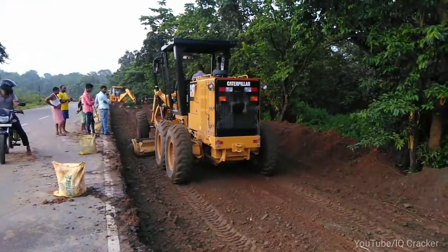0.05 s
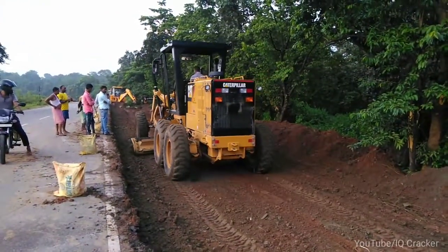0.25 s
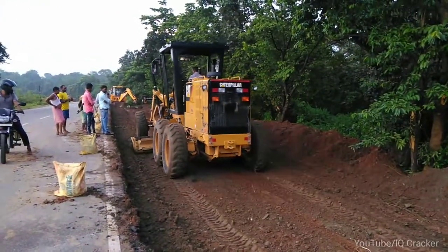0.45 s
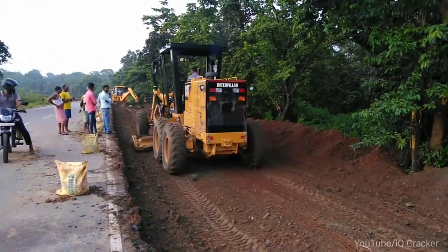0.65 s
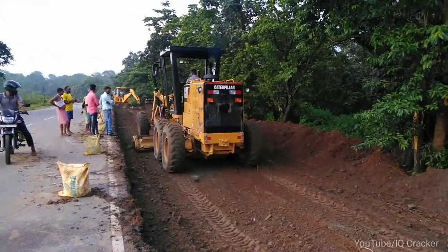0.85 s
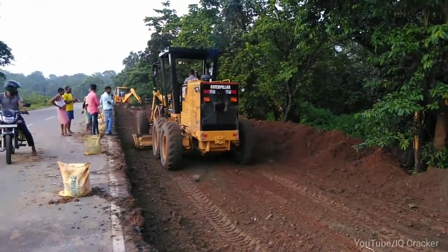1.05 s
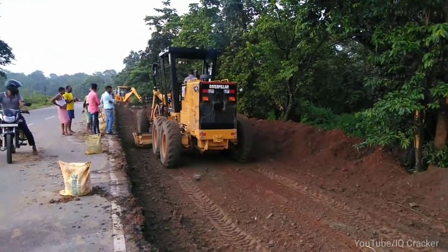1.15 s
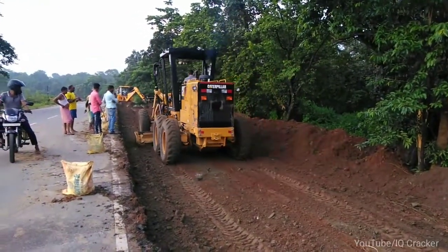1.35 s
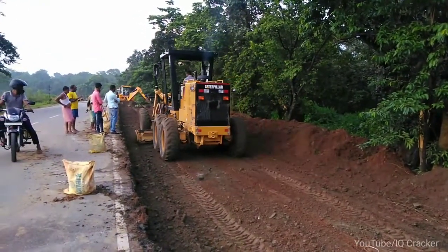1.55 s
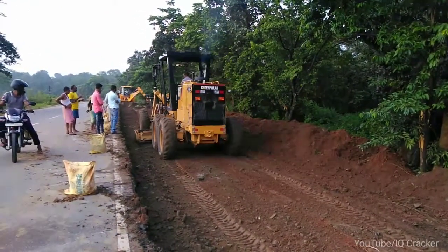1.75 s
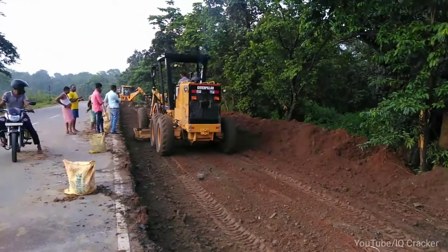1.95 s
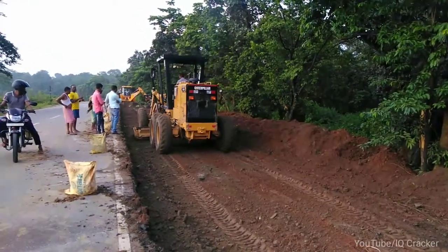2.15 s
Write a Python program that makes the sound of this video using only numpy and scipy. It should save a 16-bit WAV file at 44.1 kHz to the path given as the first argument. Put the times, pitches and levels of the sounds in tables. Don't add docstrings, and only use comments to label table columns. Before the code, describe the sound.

A large diesel road grader throbs under load, revs up hissing, then eases off outdoors

```python
import sys
import numpy as np
from scipy import signal
from scipy.fft import rfft, irfft
from scipy.io import wavfile

SR = 44100
rng = np.random.default_rng(int(sys.argv[2]) if len(sys.argv) > 2 else 0)


def level_to_linear(level):
    exponent = np.asarray(level, float) / 20
    return 10 ** exponent


def bounce(signal):
    frames = np.transpose(np.atleast_2d(signal))
    limited = np.clip(frames, -1, 1)
    pcm = np.round(limited * 32767).astype(np.int16)
    wavfile.write(sys.argv[1], SR, pcm)


N = 97020


def rms_one(x):
    return x / np.sqrt(np.mean(x ** 2) + 1e-20)


def in_time(rows):
    s, *columns = np.transpose(rows)
    return [np.interp(np.arange(N) / SR, s, c) for c in columns]


def at_hz(points, hz):
    point_hz, value = np.transpose(points)
    return np.interp(np.log(hz + 1), np.log(point_hz), value)


def drift(rate_hz):
    r = np.exp(-80 * np.pi * rate_hz / SR)
    white = rng.standard_normal(N // 40 + 2002)
    slow = signal.lfilter([1], [1, -2 * r, r * r], white)[2000:]
    return np.interp(np.arange(N) / 40, np.arange(len(slow)), rms_one(slow))


def noise(spectrum, gains, peaks=(), grain_db=0):
    hz = np.fft.rfftfreq(N, 1 / SR)
    low_hz, high_hz = spectrum[0][0], spectrum[-1][0]
    db = at_hz(spectrum, hz) + sum(d / (1 + (2 * (hz - f) / w) ** 2) for f, w, d in peaks)
    db -= 200 * ((hz < low_hz) | (hz > high_hz))
    grain = rng.standard_normal(N // 30 + 1).repeat(30)[:N]
    white = rng.standard_normal((2, N)) * level_to_linear(grain_db * grain)
    tones = rfft(white) * level_to_linear(db)
    tones /= np.sqrt(np.mean(irfft(tones, N) ** 2))
    place = np.interp(np.log(hz + 1), np.log([low_hz, high_hz]), [0, len(gains) - 1])
    return sum(g * irfft(tones * np.clip(1 - abs(place - k), 0, 1), N) for k, g in enumerate(gains))


# time in seconds, firing rate in Hz.
ENGINE_SPEED = [(0.12, 61.61), (0.3, 58.64), (0.55, 60.99), (0.8, 60.63), (1.0, 60.94), (1.12, 64.42),
                (1.25, 69.52), (1.4, 73.58), (1.55, 74.84), (1.7, 78.45), (1.85, 82.09), (2.0, 83.54),
                (2.2, 85.03)]


def firing_hz():
    return in_time(ENGINE_SPEED)[0]


def firing_count():
    return .55 + np.cumsum(firing_hz()) / SR


# time in seconds, throb level in dB rms.
EXHAUST_LOAD = [(.09, -53), (.13, -37.5), (.23, -27), (.5, -22.5), (.58, -17.5), (1.25, -17), (1.33, -22),
                (1.48, -18.5), (1.57, -20.5), (1.61, -27.5), (1.67, -20.5), (1.755, -27.5), (1.81, -21),
                (1.855, -28), (1.9, -24), (1.945, -40), (1.99, -32), (2.05, -43.5)]
# multiple of the firing rate, level in dB under the throb, phase in rad.
THROB_ORDERS = [
    (2, -23, -3.5),
    (1.5, -24, 2.5),
    (1.1667, -19, 2.5),
]
# frequency in Hz, level in dB per Hz.
RUMBLE_COLOUR = [(20, -12), (40, -6), (75, 0), (130, -3), (170, -8), (230, -18), (400, -50)]


def throb(turn):
    t = np.arange(N) / SR
    tone = np.cos(2 * np.pi * turn) * level_to_linear(0.8 * drift(33))
    for multiple, db, phase in THROB_ORDERS:
        order_level = level_to_linear(db + 1.0 * drift(12))
        tone += order_level * np.cos(2 * np.pi * multiple * turn + phase + .5 * drift(8.1))
    frame = level_to_linear(-19 + 5.2 * drift(5.8)) * np.cos(2 * np.pi * (100 * t - turn))
    frame /= 1 + (t / 1.35) ** 12
    rumble = noise(RUMBLE_COLOUR, [level_to_linear(4.0 * drift(2.7)) for _ in range(4)])
    rumble_db = -21 + 0.3863 * (firing_hz() - 57)
    return level_to_linear(in_time(EXHAUST_LOAD)[0]) * (np.sqrt(2) * (tone + frame) + level_to_linear(rumble_db) * rumble)


def puffs(turn, depth_db, count):
    w = 2 * np.pi * turn
    shape = (np.cos(w - .45 * (1 - np.cos(w))) + 1) / 2
    shape = np.clip(shape, 0, 1) ** 1.45 - 1
    draws = np.clip(rng.standard_normal((200, count + 1)), -2, 1.3)
    firing = np.floor(turn + .5).astype(int)
    chance = .4 * draws[firing, :1] + 2.4 * draws[firing, 1:]
    db = depth_db * (shape + 0.19) + (1 + shape) * chance.T
    return level_to_linear(db)


# time in seconds, level in dB.
JET_CRACKS = [(.4547, -31), (.5047, -31), (.5207, -28), (.588, -26), (.6525, -22), (.7025, -26),
              (.7181, -21), (.7552, -23), (.9984, -20), (1.2046, -27), (1.3141, -20)]


def cracks():
    t = np.arange(N) / SR
    return sum(level_to_linear(db - 2) * np.exp(-np.clip(t - s, 0, 1) / .004) * (t >= s) for s, db in JET_CRACKS)


# time in seconds, hiss level in dB, brightness in dB.
GAS_FLOW = [(.18, -58.5, 13), (.28, -42, 1), (.46, -41.5, 4), (.52, -30, 4), (.73, -26, -5.5),
            (.76, -25.5, 5), (.82, -24, 6.5), (.87, -22.5, -3.5), (.92, -21.5, 8.5), (1.01, -26, 10.5),
            (1.04, -26.5, -1), (1.22, -24, -3), (1.38, -24, -8), (1.43, -19.5, -1.5), (1.72, -23.5, -2),
            (1.93, -31, 0.5), (1.98, -39.5, 8), (2.01, -47, 13)]
# frequency in Hz, level in dB per Hz.
JET_COLOUR = [(4300, -16), (4900, -11), (5150, 3), (6800, 1), (8400, -4), (10500, -5), (12000, -10),
              (15700, -38.5)]
# frequency in Hz, width in Hz, gain in dB.
MOUTH_RINGS = [(5160, 130, 5), (5540, 250, 5), (6200, 150, -3), (6480, 300, 5), (7300, 300, 2),
               (9200, 500, 9), (9560, 150, -6), (10000, 200, -3)]
# frequency in Hz, level in dB per Hz.
ROAR_COLOUR = [(700, -25), (1000, -11), (1250, -4), (2000, -3), (2500, -3), (3100, -6), (4700, -4),
               (5600, -20)]
# frequency in Hz, width in Hz, gain in dB.
PIPE_RINGS = [(1780, 200, 5), (2040, 120, -2), (2650, 200, 6), (3350, 350, 5), (3750, 150, -6),
              (4000, 200, 3), (4480, 200, -3)]


def jet(turn):
    flow_db, bright_db = in_time(GAS_FLOW)
    depth_db = 15 - .3 * (firing_hz() - 61)
    crack = cracks()
    grain_db = .7

    height = np.linspace(0, 1, 12)[:, None] ** 3
    tilt = level_to_linear(height * 2.05 * bright_db)
    hiss_depth_db = depth_db * (1 - (1 - 0.26) * height)
    hiss_gains = level_to_linear(flow_db) * puffs(turn, hiss_depth_db, count=12) + crack * (1 - height)
    hiss = noise(JET_COLOUR, hiss_gains * tilt, MOUTH_RINGS, grain_db)

    patches = np.array([level_to_linear(2.2 * drift(10.6)) for _ in range(8)])
    loudest_db = flow_db.max()
    roar_db = loudest_db - 10 + 0.55 * (flow_db - loudest_db)
    roar_gains = level_to_linear(roar_db) * (puffs(turn, 0.52 * depth_db, count=8) * patches)
    roar = noise(ROAR_COLOUR, roar_gains, PIPE_RINGS, grain_db)
    return hiss + roar + 0.69 * crack * noise(ROAR_COLOUR, [1, 1])


# time in seconds, frequency in Hz, level in dB, length in seconds.
PANEL_RINGS = [
    (.095, 850, -34, .006),
    (1.265, 1230, -35, .03),
    (1.27, 1390, -37, .03),
    (1.45, 1390, -39, .09),
    (1.635, 1450, -41, .04),
    (1.56, 2620, -40, .02),
    (.59, 2650, -38, .01),
]


def panel_rings():
    t = np.arange(N) / SR
    total = 0
    for s, hz, db, length_s in PANEL_RINGS:
        swell = np.exp(-((t - s) / length_s) ** 2 * 4)
        total = total + level_to_linear(db) * swell * np.sin(2 * np.pi * hz * t + drift(40))
    return total


# frequency in Hz, level in dB per Hz.
CLATTER_COLOUR = [(30, -6), (90, -6), (300, -0.5), (420, -8), (1700, -12), (4500, -16), (11000, -22),
                  (15500, -23)]


def clatter():
    patches = [level_to_linear(1.6 * drift(6)) for _ in range(12)]
    level_db = -44.5 + 0.1913 * (firing_hz() - 54)
    return level_to_linear(level_db) * noise(CLATTER_COLOUR, patches, grain_db=2)


# frequency in Hz, share from 0 to 1.
DIFFUSE_SHARE = [(600, .34), (1380, .6), (1620, .28), (2550, .75), (2950, .38), (3600, .8), (5300, .5),
                 (7000, .9)]


def scene():
    turn = firing_count()
    direct, other = rfft(throb(turn) + jet(turn) + clatter() + panel_rings())
    share = np.clip(at_hz(DIFFUSE_SHARE, np.fft.rfftfreq(N, 1 / SR)), 0, 1)
    return irfft([np.sqrt(1 - share ** 2) * direct + share * other, direct], N)


# frequency in Hz, lead in rad.
LEFT_LEAD = [(1400, 0), (1800, -.6), (2200, -.2), (2450, .7), (2800, .5), (4000, .85), (4350, -.1),
             (6600, -1)]


def left_port(hz, echo):
    shelf_db = -16 / (1 + (6000 / (hz + 1)) ** 20)
    notch_db = -18 / (1 + (2 * (hz - 10200) / 1300) ** 6)
    phase = at_hz(LEFT_LEAD, hz) - 2 * np.pi * hz * 9 / SR
    return (1 - .6 * echo) * level_to_linear(-1.5 + shelf_db + notch_db) * np.exp(1j * phase)


def right_port(hz, echo):
    return (1 + .3 * echo) * 1j * hz / (69 + 1j * hz)


def band_limit(x):
    return signal.sosfilt(signal.butter(12, 15760, fs=SR, output="sos"), x)


def record(dry):
    hz = np.fft.rfftfreq(N, 1 / SR)
    echo = np.exp(-2j * np.pi * hz * .00179)
    echo = echo / (1 + (hz / 2600) ** 4) / (1 + (250 / (hz + 1)) ** 2)
    bass_lag = np.exp(-.35j / (1 + (hz / 200) ** 2))
    ports = np.array([left_port(hz, echo), right_port(hz, echo)])
    heard = irfft(rfft(dry) * ports * bass_lag * level_to_linear(3.0), N)
    heard = heard / (1 + (heard / .8) ** 4) ** .25
    return band_limit(heard)


dry = scene()
out = record(dry)
bounce(out)
```